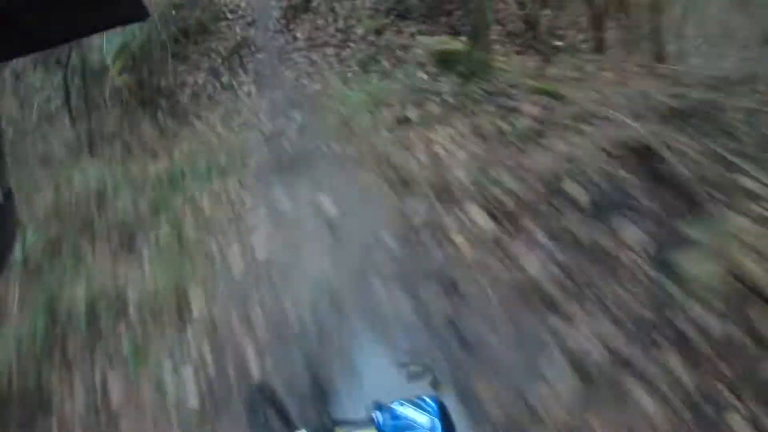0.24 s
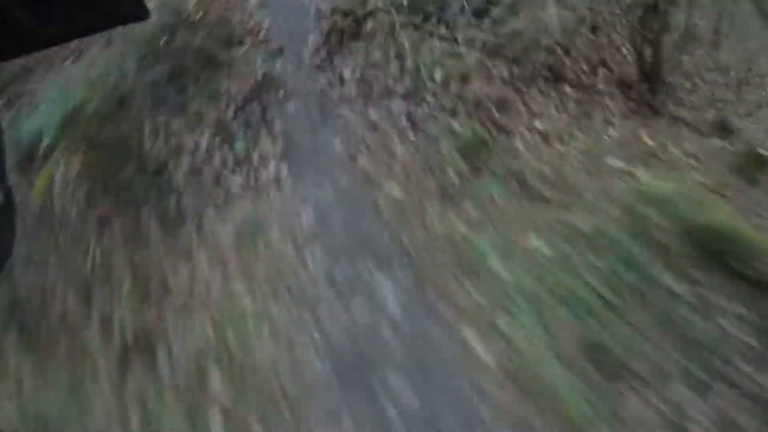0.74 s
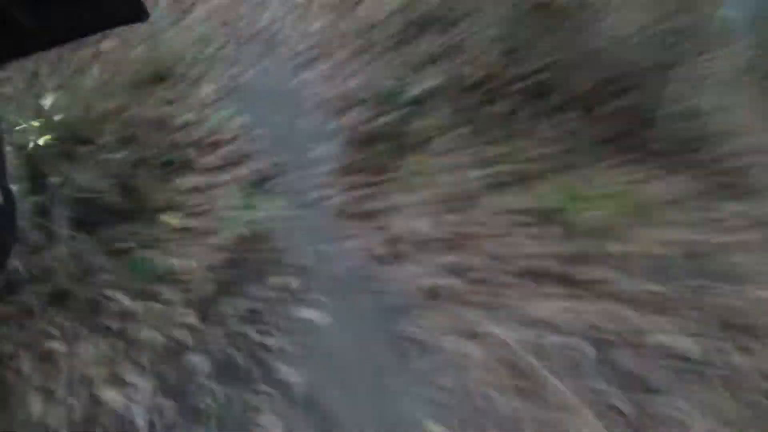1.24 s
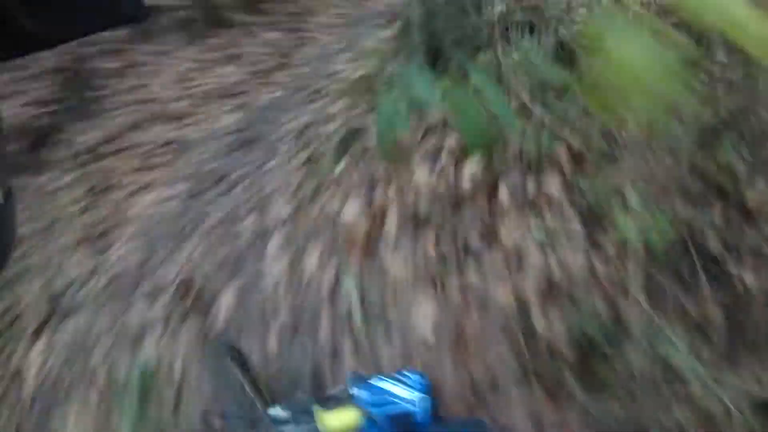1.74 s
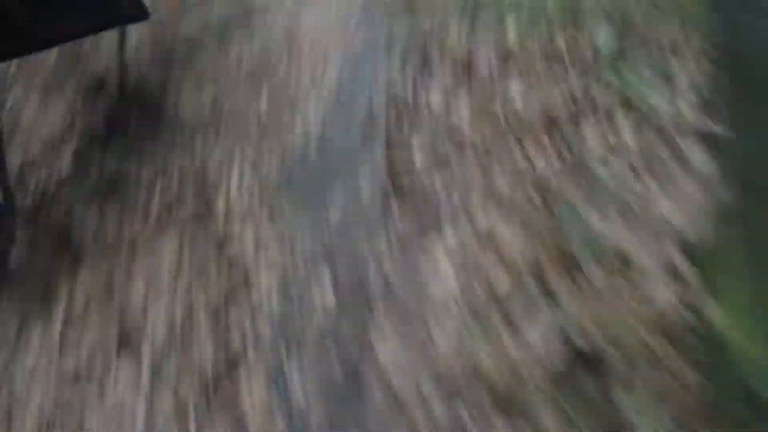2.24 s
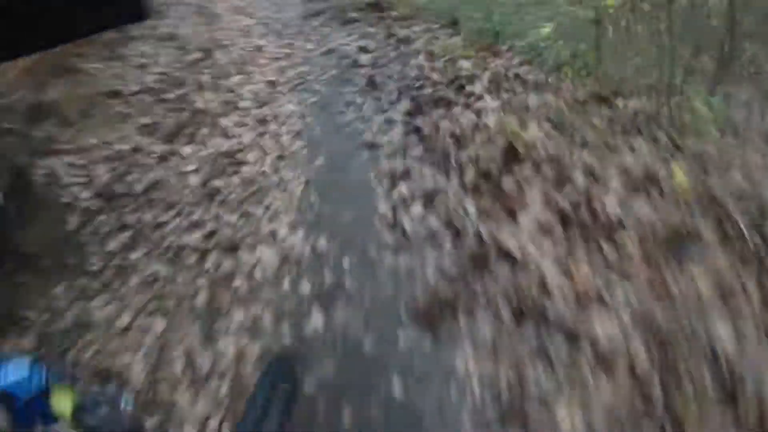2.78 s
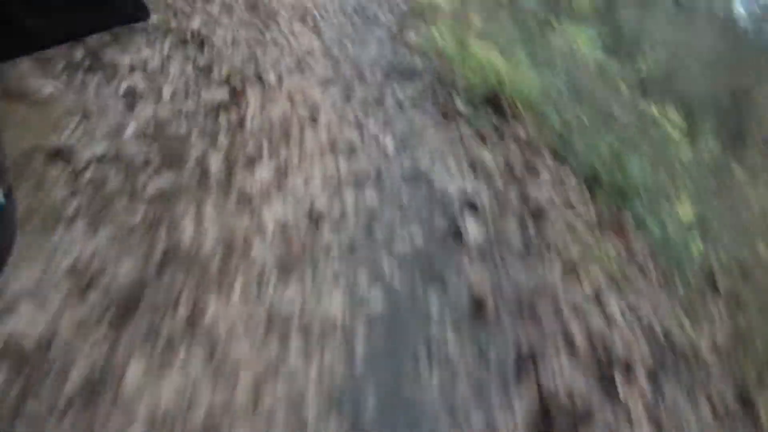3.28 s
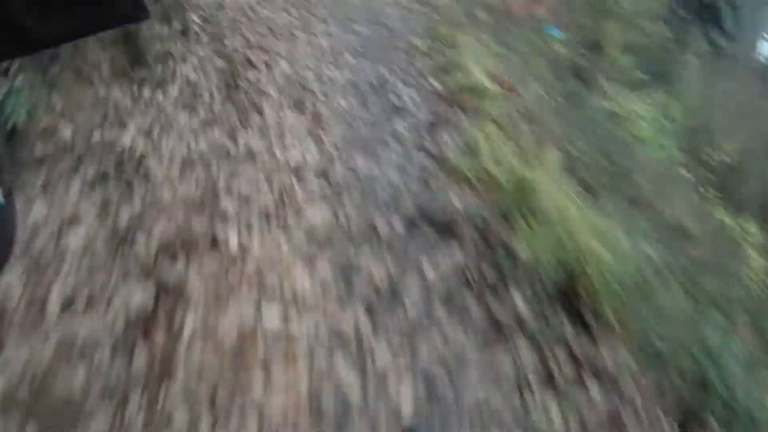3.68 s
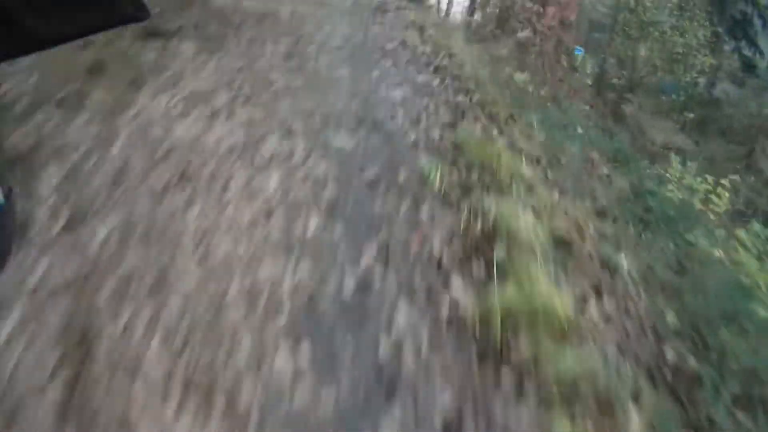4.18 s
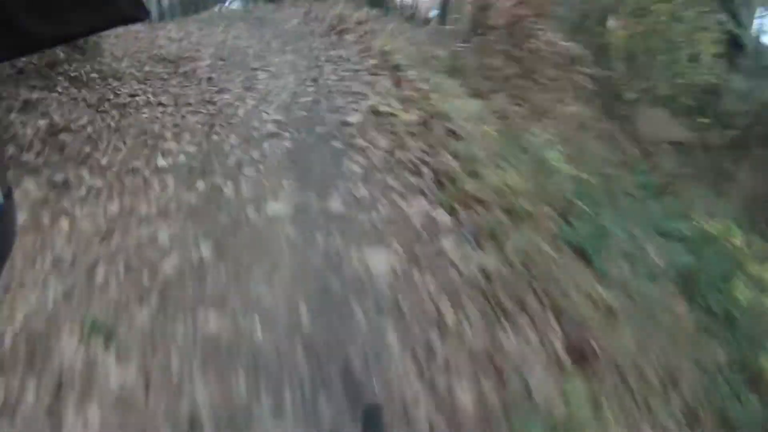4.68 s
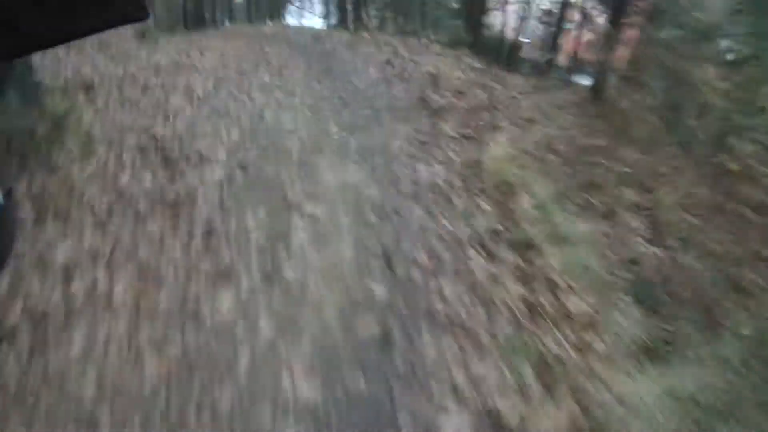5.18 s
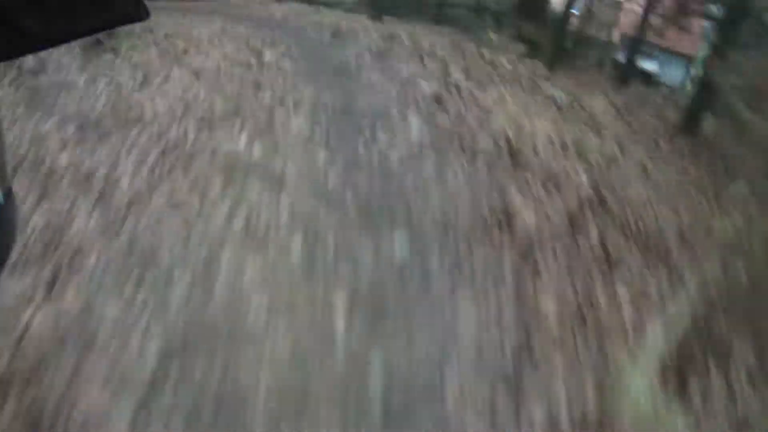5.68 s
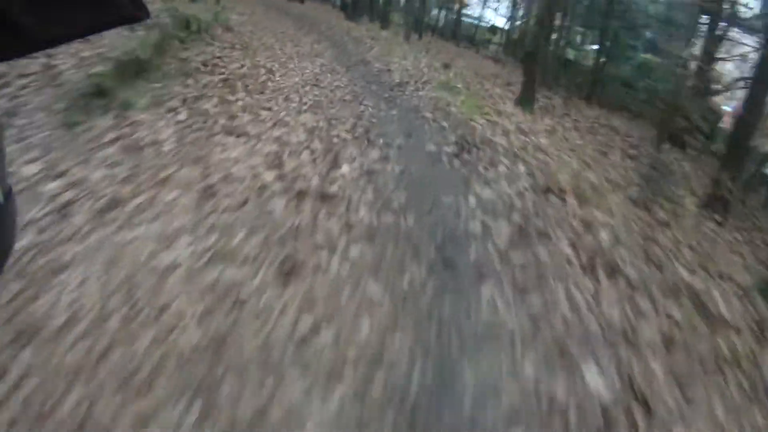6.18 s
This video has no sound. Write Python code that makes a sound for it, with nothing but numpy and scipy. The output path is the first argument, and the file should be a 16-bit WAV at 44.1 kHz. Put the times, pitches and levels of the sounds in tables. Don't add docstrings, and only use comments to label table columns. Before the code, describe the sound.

A fast bike ride on a leafy forest trail, heard through one sealed helmet microphone, nearly mono and muffled. At 0 s a low wind rumble is joined by a short thud, crisp snaps and millisecond dropouts. The roar grows from 0.7 to 1.4 s, fluttering, with a faint airy hiss, dull frame knocks near 0.8 and 1.05 s, and clipped jolts around 0.9 and 1.2 s. A heavier thud and knock land at 1.55 s. Wind sinks around 2.3 s, exposing dry leaf crackle, a twig snap and rattly knocks near 2.55 s, then a soft deep thud at 2.85 s. From about 3.5 s the wind surges, dense and loud, with rasping, hissing blasts, hard pops and ragged tears at 4.5 to 5.9 s. Leaves crunch underneath. A tiny dropout comes at 5.35 s; the last blast hisses sharply from 6.2 s until the abrupt end at 6.4 s.

```python
import sys
import numpy as np
from scipy import signal
from scipy.fft import rfft, irfft
from scipy.io import wavfile
from scipy.ndimage import uniform_filter1d, map_coordinates

SR = 44100
rng = np.random.default_rng(int(sys.argv[2]) if len(sys.argv) > 2 else 0)


def volts(x):
    e = np.asarray(x, float) / 20
    return 10 ** e


def dump_mix(stems):
    frames = np.atleast_2d(stems).T
    limited = np.clip(frames, -1, 1)
    pcm = np.round(limited * 32767).astype(np.int16)
    wavfile.write(sys.argv[1], SR, pcm)


N = 283563

# pitch_hz, level_db (per Hz)
BUFFET_COLOUR = [(30, -37), (54, -11), (95, -6), (150, -5.5), (210, -10.5), (330, -49)]
ROAR_COLOUR = [(70, -28), (140, -5), (210, 0), (300, -2.5), (500, -5.5), (680, -14.5), (1000, -26),
               (1650, -36.5)]
EDGE_COLOUR = [(300, -8), (600, -4), (900, -4), (2000, -10.5), (2320, -19), (3400, -38.5), (4420, -49)]
WHISTLE_COLOUR = [(1410, 1), (2400, 0), (2710, -5.5), (3030, -9.5), (3580, -12), (4020, -7.5), (4800, -23),
                  (6240, -43), (10600, -120)]
PORT_COLOUR = [(3300, -24), (3800, -1), (4050, -3), (4300, -8), (5000, -33)]
RIM_COLOUR = [(2200, -25), (2700, 0.5), (3100, 2), (3400, -6), (3900, -25)]
SHAKE_COLOUR = [(15, -42), (28, -4), (55, -0.5), (110, -15)]
LEAF_COLOUR = [(2500, -8), (3300, -6), (4510, -7), (5120, -5.5), (5600, -7), (6450, -4), (8060, -9.5),
               (10000, -20), (13000, -13), (15200, -13.5)]
CRISP_COLOUR = [(7000, -38), (8300, -10), (9500, -2.5), (11000, -7.5), (12600, -13), (14500, -32)]
BRUSH_COLOUR = [(5600, -30), (6300, -7), (6650, 3), (7000, -2), (7800, -30)]
HISS_COLOUR = [(60, -32), (400, -11), (2400, -11), (4000, -11), (9100, -9.5), (12500, -12), (15200, -17)]
HISS_APART = [(60, -3), (9300, -4.5), (9900, -7), (15200, -10)]
SURGE_COLOUR = [(30, -16), (150, 3.5), (450, 2), (1100, -9), (2400, -24), (5000, -35)]

# time_s, flow_db, sharpness_db, slow_heave_db
AIR = [(0, -51, -13.5, 2), (.36, -48, -12.5, -0.5), (.75, -43, -13, -3), (1.1, -40.5, -14.5, -12),
       (1.4, -41.5, -14, -5), (1.7, -44.5, -12, -0.5), (2.08, -47.5, -12.5, -0.5), (2.33, -57.5, -11.5, -1),
       (2.58, -52.5, -4.5, 0), (2.8, -47.5, -16, -2.5), (3.15, -46.5, -18, 1.5), (3.55, -34, -17.5, -3.5),
       (4.15, -33, -14.5, -1.5), (4.55, -35.5, -11, -0.5), (5.0, -35, -13, 0), (5.45, -34, -11, 2.5),
       (5.9, -35, -15, 0.5), (6.43, -32, -11, -8.5)]
# middle_s, length_s, level_db
GUSTS = [(0.018, 0.03, 3), (0.044, 0.015, -1), (0.083, 0.075, -2), (0.317, 0.04, 5), (0.468, 0.045, 3.5),
         (0.678, 0.083, -1), (1.02, 0.053, 2.5), (1.16, 0.12, 4.5), (1.297, 0.035, -3.5), (1.416, 0.1, -4),
         (1.58, 0.13, 0.5), (1.7, 0.12, 2), (1.908, 0.048, -1.5), (2.553, 0.054, -1.5), (2.878, 0.038, 0),
         (3.06, 0.022, 0), (3.29, .05, 4), (3.42, 0.079, -1), (3.59, 0.12, 3), (3.67, 0.13, 2.5),
         (3.97, 0.07, -2.5), (4.29, 0.24, -1.5), (4.4, 0.11, 1.5), (4.525, 0.2, -2.5), (4.87, 0.052, -1.5),
         (4.966, 0.066, 3.5), (5.188, 0.088, -4.5), (5.33, 0.071, 2), (5.6, 0.08, 0.5), (5.743, 0.12, -4),
         (6.01, 0.1, -2.5), (6.167, 0.16, 2), (6.394, 0.036, 1.5)]
# start_s, length_s, added_sharpness_db, added_whistle_db
BLASTS = [
    (0.793, 0.82, 0.5, 4.5),
    (2.25, 0.35, -5, 10.5),
    (3.595, 0.36, 8, 5),
    (5.853, 0.475, 2, 1.5),
    (6.243, .3, 1.5, 6.5),
]
# start_s, peak_db, body_db
STRONG_EDDIES = [(0.388, -38, 2.5), (0.433, -37, -8), (0.46, -42, -6), (0.537, -35.5, -20),
                 (0.588, -37, -5.5), (0.745, -33, -7.5), (0.814, -45, -8), (1.182, -40, 1),
                 (1.205, -38.5, 7), (1.802, -35, -15), (1.996, -36, -5), (2.591, -38, -13),
                 (2.717, -42.5, -2), (2.805, -45.5, 4), (3.007, -48, 4), (3.142, -49.5, 15),
                 (3.284, -40, 0), (3.408, -54, 3), (3.483, -42, 1), (4.128, -33, -6), (4.361, -29, -2),
                 (4.49, -24, -17), (4.647, -37, -9), (4.865, -24, -8), (4.889, -24, -12), (5.075, -42, 6),
                 (5.454, -30, -2), (5.687, -34, -4), (5.803, -26.5, -8), (5.866, -24.5, -8)]
# start_s, peak_db, brightness_db
TEARS = [(0.2596, -54, -30), (0.4332, -41, -21), (0.4604, -46, -33), (0.536, -50, -19), (0.5871, -43, -36),
         (0.6163, -45, -43), (0.7453, -49, -31), (0.8132, -40.5, -16), (1.0571, -39, -28),
         (1.2252, -43, -28), (1.5489, -39, -31), (1.6058, -44, -27), (1.747, -39, -36),
         (1.9964, -42.5, -31), (2.5463, -47, -27), (2.718, -47, -31), (3.484, -46, -26), (3.6027, -33, -29),
         (3.6307, -38, -32), (3.664, -39, -20), (3.8468, -39, -30), (3.9988, -41, -30), (4.061, -31.5, -32),
         (4.1076, -36.5, -33), (4.1271, -38, -34), (4.3601, -40, -18), (4.374, -37, -22), (4.403, -47, -21),
         (4.4193, -36, -21), (4.4738, -38, -27), (4.491, -33, -35), (4.5352, -34, -32), (4.6479, -34, -30),
         (4.6986, -35, -48), (4.7248, -32.5, -42), (4.7906, -46, -34), (4.8385, -38, -29),
         (4.8684, -30, -33), (4.8914, -32, -28), (4.9429, -34, -30), (5.0557, -33.5, -33),
         (5.0754, -43, -33), (5.1233, -39.5, -35), (5.2495, -40, -35), (5.2585, -38, -33),
         (5.3593, -40, -25), (5.4511, -33, -26), (5.5428, -37.5, -28), (5.6878, -33.5, -34),
         (5.7868, -34.5, -39), (5.8063, -39, -36), (5.8646, -33, -30), (5.906, -45, -30),
         (6.0569, -33.5, -24), (6.135, -33, -33), (6.1937, -36.5, -16), (6.2213, -42, -30),
         (6.2468, -36.5, -13.5), (6.3416, -30.5, -20), (6.373, -30, -33),
         (0.123, -60, -17), (0.2144, -54, -27), (0.293, -52, -28), (0.3144, -48, -26),
               (0.412, -50, -25), (0.4778, -45, -33), (0.5122, -52, -20), (0.5544, -49, -23),
               (0.658, -42, -34), (0.719, -43, -32), (0.998, -49, -18), (1.1226, -41.5, -35),
               (1.3608, -44, -32), (1.476, -53, -17), (1.6847, -41, -37), (1.7153, -43.5, -26),
               (1.779, -48, -31), (1.8008, -48, -27), (1.8498, -41.5, -31), (1.8956, -48, -29),
               (2.138, -57, -28), (2.6897, -46, -29), (2.746, -57, -18), (2.8055, -51, -29),
               (2.8285, -53, -28), (2.9701, -52, -26), (3.0076, -55, -25), (3.0682, -46, -38),
               (3.1107, -51, -30), (3.2063, -52, -29), (3.283, -42, -29), (3.4092, -43, -24),
               (3.6474, -30, -28), (3.6794, -38, -22), (3.7194, -33, -21), (3.7842, -36, -15),
               (3.799, -42, -16), (3.8248, -40, -23), (3.8692, -39, -17), (3.8997, -31.5, -20),
               (3.9194, -38, -26), (4.2991, -45.5, -17), (4.7727, -33, -34), (4.851, -33.5, -24),
               (4.9784, -33, -39), (4.9998, -39, -29), (5.0346, -45, -34), (5.1418, -38, -28),
               (5.3294, -42, -29), (5.4888, -35, -27), (5.6066, -34, -24), (5.889, -51, -32),
               (5.9844, -38, -16), (6.01, -41.5, -15), (6.2694, -38, -21), (6.3209, -38, -14),
               (6.402, -36.5, -13)]
# time_s, depth_db, dryness_db
LITTER = [(0, -81.5, -6), (.66, -88.5, 0.5), (1.1, -84, -3), (1.5, -81.5, 0), (1.85, -88, -3),
          (2.18, -76.5, -3), (2.32, -85.5, 3), (2.46, -74, 2.5), (2.68, -73.5, -5), (2.76, -78, -4),
          (2.87, -82.5, -0.5), (3.3, -81, -5), (3.5, -74.5, -3.5), (4.12, -75.5, -3), (4.52, -72, -4.5),
          (4.8, -79.5, -2.5), (5.95, -80.5, -3), (6.25, -75, -3), (6.43, -79, -3)]
# middle_s, length_s, level_db
DRIFTS = [
    (1.34, 0.055, 5),
    (1.48, .08, 7),
    (2.97, 0.11, 4.5),
    (3.88, .08, 2.5),
    (4.1, 0.26, 5.5),
    (4.5, .08, 1),
    (5.12, 0.29, 5),
    (5.58, .1, 2.5),
    (6.38, .06, 1),
]
# start_s, peak_db, dullness_db, ring_s (time to fall 60 dB)
SNAPS = [(0.0082, -42, -25, 0.0056), (0.0205, -51, -8, 0.009), (0.2848, -62, -15, .06),
         (0.134, -65, -5, .03), (0.459, -58, -22, .04), (0.5402, -58, -15, .03), (0.813, -52.5, -4, 0.12),
         (0.8879, -55, -7, .04), (0.9043, -54, -9, .04), (0.9622, -61, -13, 0.095), (1.043, -52, 0, 0.036),
         (1.0555, -56, -9, 0.06), (1.29, -58, -15, .025), (1.3324, -58, -10, .04), (1.559, -60, 5, 0.11),
         (1.6955, -57, -22, .02), (1.7994, -60, -16, .04), (1.973, -56.5, -21, .05),
         (2.101, -49.5, -31, 0.05), (2.384, -65, -17, .04), (2.548, -58.5, -0.5, 0.13),
         (2.59, -44, -9, 0.029), (2.669, -54.5, -3, 0.064), (3.864, -46, 5, 0.024),
         (4.001, -52, -11, 0.049), (4.066, -55, -3, .04), (4.0881, -47, -11, 0.029), (4.1011, -51, -5, .05),
         (4.488, -56, -5, .05), (4.8155, -55, -20, .02), (4.9375, -45.5, -3.5, 0.045),
         (4.9926, -57, -15, .025), (5.037, -60, -12, .06), (5.0519, -52.5, -20, .05), (5.797, -59, -7, .05),
         (6.047, -58, 2, 0.054), (6.184, -50, -9, 0.037), (6.2248, -57, -8, 0.065),
         (6.35, -55.5, 13, 0.037)]
# start_s, level_db, pitch_hz, ring_s
LANDINGS = [
    (0.0402, -33, 70, 0.021),
    (1.551, -32, 57.7, 0.053),
    (1.619, -39, 70, 0.046),
    (2.84, -38, 55, 0.05),
]
# start_s, peak_db, upper_mode_hz, upper_mode_db, ring_length_share
KNOCKS = [(.26, -59, 1520, 17, 0.33), (0.435, -50, 1900, 3, 0.34), (0.539, -59, 3180, 5, .4),
          (0.616, -53, 1600, 15, 0.4), (0.812, -46.5, 1710, -10, 1.1), (1.0568, -47.5, 2030, 8.5, 1.14),
          (1.549, -53.5, 1556, 8, 1.9), (2.138, -63, 3800, 3, .6), (2.5446, -45.5, 1760, 5, 0.78),
          (2.5507, -50, 1750, 1, 0.6), (0.815, -61, 3820, 10, .8), (2.673, -61, 1400, 2, 0.69)]
# pitch_hz, level_db, ring_s
FRAME_MODES = [(1230, 7, 0.061), (1400, -14, 0.036), (3600, -16.5, 0.026)]
# start_s, length_s, level_db
SINGS = [
    (.8, 0.63, 12),
    (3.62, .33, 6),
    (4.0, 0.3, 18),
    (4.35, .2, 12),
    (5.82, .24, 16),
    (6.07, .16, 19),
    (6.25, .3, 18),
]
# start_s, length_s, level_db
RASPS = [
    (.85, .45, 4),
    (3.6, 0.23, 23),
    (3.83, .11, 21),
    (4.3, 0.29, 18),
    (6.25, .12, 22),
    (6.39, .1, 17),
]
# start_s, length_s, level_db
BRUSHES = [
    (2.42, .26, 6),
    (3.86, .7, 10),
    (6.17, 0.13, 27),
]
# start_s, end_s, kick_before, kick_after
STALLS = [
    (.0285, .0384, -.052, -.038),
    (.049, .0528, -.02, -.006),
    (.917, .9198, .012, .016),
    (1.1972, 1.198, 0, 0),
    (1.2012, 1.204, 0, -.034),
    (1.5715, 1.5755, .05, .034),
    (5.3462, 5.3492, .025, .03),
]
# middle_s, level_db
SPLITS = [(.04, -42), (.7, -74), (.92, -50), (1.2, -47), (1.315, -54), (1.57, -49), (1.664, -50),
          (3.425, -46), (3.81, -59), (4.05, -56), (4.16, -61), (5.35, -46), (5.395, -47), (5.59, -65)]
# start_s, end_s
TREBLE_SHUT = [(0, .37), (.4, .6), (.63, .8), (.91, 1.04), (1.08, 1.68), (1.71, 2.09), (2.22, 2.4),
               (2.53, 2.62), (3.23, 3.27), (3.47, 3.49), (3.95, 4), (4.81, 4.84), (5.24, 5.26),
               (5.63, 5.68)]

BUFFET_DB, WHISTLE_DB = -46.5, -72.5


def unit(x):
    return x / np.sqrt(np.mean(x ** 2) + 1e-20)


def wobble(rate):
    knots = rng.standard_normal(int(N * rate / SR) + 4)
    return map_coordinates(knots, [np.arange(N) * rate / SR])


def response(spectrum, size=4096):
    hz, db = np.transpose(spectrum)
    log_hz = np.log(np.fft.rfftfreq(size, 1 / SR) + 1)
    gain = volts(np.interp(log_hz, np.log(hz), db, -120, -120))
    cepstrum = irfft(np.log(gain + 1e-6), size)
    cepstrum[1:size // 2] *= 2
    cepstrum[size // 2 + 1:] = 0
    h = irfft(np.exp(rfft(cepstrum)), size)
    return h / np.linalg.norm(h)


def coloured(x, spectrum):
    return signal.fftconvolve(x, response(spectrum))[:N]


def grains(per_s, spread_db, smooth):
    draw = rng.random((3, N))
    size = volts(spread_db * np.minimum(-np.log(1 - draw[1]), 4.5)) * np.sign(draw[2] - .5)
    hits = unit(size * (draw[0] < per_s / SR))
    return hits + smooth * rng.standard_normal(N)


def add(track, s, sound):
    part = track[round(s * SR):][:len(sound)]
    part += sound[:len(part)]


def curves(rows):
    s, *cols = np.transpose(rows)
    return [np.interp(np.arange(N) / SR, s, c) for c in cols]


def bumps(rows):
    t = np.arange(N) / SR
    return sum(db * np.exp(-(2 * (t - s) / length) ** 2) for s, length, db in rows)


def plateaus(rows, column):
    t, edge_s = np.arange(N) / SR, 0.087
    total = np.zeros(N)
    for row in rows:
        inside_s = np.minimum(t - row[0], row[0] + row[1] - t)
        total += row[column] * np.clip(inside_s / edge_s + .5, 0, 1)
    return total


def airflow():
    flow_db, sharp_db, heave_db = curves(AIR)
    flow = flow_db + 42
    sharp = sharp_db + 14 + plateaus(BLASTS, column=2)
    gust = bumps(GUSTS)
    buffet_db = BUFFET_DB + 0.8 * flow + heave_db + gust
    roar_db = -42.5 + flow + gust
    edge_db = -56 + flow + sharp + 1.2 * gust
    whistle_db = WHISTLE_DB + 0.61 * flow + 0.8 * sharp + 0.64 * gust + plateaus(BLASTS, column=3)
    return buffet_db, roar_db, edge_db, whistle_db


def lesser_eddies(roar_db):
    per_s, over_roar_db, spread_db = 2, 2, 3
    draw = rng.random((int(per_s * N / SR), 3))
    s = .1 + draw[:, 0] * (N / SR - .2)
    db = roar_db[(s * SR).astype(int)] + over_roar_db + 2 * spread_db * (draw[:, 1] - .5)
    body_db = -3 + 8 * (draw[:, 2] - .5)
    return list(zip(s, db, body_db))


def bursts(rows):
    lull_db, body, crest = np.zeros((3, N))
    t = np.arange(SR // 30) / SR
    for s, db, body_db in rows:
        ragged = 0.1 * rng.standard_normal(len(t)) * volts(-60 * t / 0.042)
        ragged[0] = np.sign(ragged[0])
        add(crest, s, ragged * volts(db + 1.5))
        add(body, s, ragged * volts(db + body_db + 19.0))
        add(lull_db, s - .008, -6 * np.hanning(SR // 110))
    sharp = coloured(crest, EDGE_COLOUR) + volts(-42.0) * coloured(crest, WHISTLE_COLOUR)
    return volts(lull_db), coloured(body, ROAR_COLOUR) + sharp


def air_tears():
    rise_s, ring_s = .005, .011
    gap_db, dull, bright = np.zeros((3, N))
    t = np.arange(SR // 30) / SR
    swell = np.sin(np.pi / 2 * np.minimum(t / rise_s, 1)) ** 2
    shape = swell * volts(-60 * np.maximum(t - rise_s, 0) / ring_s)
    for s, db, bright_db in TEARS:
        spikes = unit(rng.standard_normal((2, len(t))) * rng.exponential(size=len(t)) ** .5)
        tear = spikes * shape ** rng.uniform(.6, 1.1) * volts(db - 5.5)
        add(dull, s - .003, tear[0])
        add(bright, s - .003, tear[1] * volts(bright_db + 10))
        add(gap_db, s - .012, -1.5 * np.hanning(SR // 90))
    return volts(gap_db), coloured(dull, EDGE_COLOUR) + coloured(bright, WHISTLE_COLOUR)


def wind(buffet_db, roar_db, edge_db, whistle_db):
    dense = np.clip((whistle_db + 72.5) / 12, 0, 1)
    flutter = (0.48 * wobble(13) + 0.57 * wobble(55)) * (1 - .5 * dense)
    coarse = unit(grains(per_s=700, spread_db=2.0, smooth=0.56) * volts(1.06 * wobble(150)))
    finer = unit(grains(per_s=2000, spread_db=3.0, smooth=0.87))
    eddies = np.sqrt(1 - 0.78 * dense) * coarse + np.sqrt(0.3 * dense) * finer
    lull, strong = bursts(STRONG_EDDIES + lesser_eddies(roar_db))

    buffet = unit(coloured(rng.standard_normal(N) + 0.13 * eddies, BUFFET_COLOUR)) * volts(buffet_db)
    body = unit(coloured(eddies + 1.14 * rng.standard_normal(N), ROAR_COLOUR))
    belly = signal.sosfiltfilt(signal.butter(2, 240, fs=SR, output="sos"), body)
    belly = belly * (volts(0.38 * (buffet_db - roar_db + 4)) - 1)
    brow = signal.sosfiltfilt(signal.butter(2, 430, "high", fs=SR, output="sos"), body)
    brow = brow * (volts(1.8 * (wobble(24) + 0.53 * wobble(60)) - 1.2) - 1)
    roar = (body + brow + belly) * volts(roar_db + 0.33 * flutter)

    edge_db = edge_db - .6 + .8 * flutter + 1.1 * wobble(22) + .5 * wobble(90)
    edge = unit(coloured(eddies, EDGE_COLOUR)) * volts(edge_db)
    whistle_db = whistle_db + 2.3 * flutter + 0.46 * wobble(26)
    whistle = unit(coloured(0.076 * coarse + finer, WHISTLE_COLOUR)) * volts(whistle_db)
    gap, tears = air_tears()
    up, down = .45, .08
    crest = np.sqrt(1 + up * np.maximum(body, 0) ** 2 + down * np.minimum(body, 0) ** 2)
    ride = crest / np.sqrt(1 + (up + down) / 2)
    return buffet + (roar + (edge + whistle) * gap * ride) * lull + strong + tears * np.sqrt(ride)


def helmet_shake(buffet_db):
    level_db = BUFFET_DB - 7.5 + 0.25 * (buffet_db - BUFFET_DB) + 2.5 * wobble(6.2)
    return unit(coloured(rng.standard_normal(N), SHAKE_COLOUR)) * volts(level_db)


def leaf_grains():
    return grains(per_s=6500, spread_db=4.5, smooth=0.86) * volts(0.25 * wobble(13.0) + 0.32 * wobble(28))


def leaves():
    depth_db, dry_db = curves(LITTER)
    depth_db = depth_db + bumps(DRIFTS) + wobble(30)
    rustle = unit(coloured(leaf_grains(), LEAF_COLOUR)) * volts(depth_db + 2.5)
    crackle = unit(coloured(leaf_grains(), CRISP_COLOUR)) * volts(depth_db + dry_db - 0.5)

    plain, crisp, dull = np.zeros((3, N))
    t = np.arange(SR // 8) / SR
    for s, db, dull_db, ring_s in SNAPS:
        fade = volts(db - 7 - 60 * t / ring_s) * (1 - np.exp(-t / 0.002))
        burst = rng.standard_normal((3, len(t))) * fade
        add(plain, s, burst[0])
        add(dull, s, burst[1] * volts(dull_db + 9.5))
        add(crisp, s, burst[2] * volts(-9 - 0.36 * dull_db))
    plain = signal.sosfilt(signal.butter(3, 11500, fs=SR, output="sos"), plain)
    snaps = coloured(plain, LEAF_COLOUR) + coloured(dull, WHISTLE_COLOUR) + coloured(crisp, CRISP_COLOUR)
    return rustle + crackle + snaps


def frame():
    out, t = np.zeros(N), np.arange(SR // 6) / SR
    for s, db, hz, level_db, share in KNOCKS:
        spot_modes = [(hz, level_db, .04), (1.2 * hz, level_db - 15.0, .04)]
        for mode_hz, mode_db, ring_s in FRAME_MODES + spot_modes:
            fade = volts(db + 1.0 + mode_db - 60 * t / (ring_s * share))
            attack = 1 - np.exp(-t / (0.0025 * share))
            add(out, s, fade * np.sin(2 * np.pi * mode_hz * t) * attack)
    for s, db, hz, ring_s in LANDINGS:
        thud = volts(db + 14.5 - 60 * t / ring_s) * np.sin(2 * np.pi * hz * t)
        add(out, s, thud * (1 - np.exp(-t / 0.0078)))
    return out


def port(whistle_db):
    level_db = -98 + 0.37 * (whistle_db - WHISTLE_DB) + plateaus(SINGS, column=2) + 2.6 * wobble(30)
    return unit(coloured(grains(per_s=3700, spread_db=4.5, smooth=0.82), PORT_COLOUR)) * volts(level_db)


def rasp():
    level_db = -89 + plateaus(RASPS, column=2) + 1.5 * wobble(45)
    return unit(coloured(grains(per_s=990, spread_db=3.5, smooth=0.72), RIM_COLOUR)) * volts(level_db)


def brushing():
    level_db = -102 + plateaus(BRUSHES, column=2) + 1.5 * wobble(25)
    return unit(coloured(grains(per_s=2500, spread_db=0.0, smooth=.6), BRUSH_COLOUR)) * volts(level_db)


def scene():
    air_db = airflow()
    air = wind(*air_db) + port(air_db[3]) + rasp()
    bike = helmet_shake(air_db[0]) + leaves() + frame() + brushing()
    return np.tile(air + bike, (2, 1))


def hiss():
    both, other = (unit(coloured(rng.standard_normal(N), HISS_COLOUR)) for _ in range(2))
    other = volts(-3.5) * unit(coloured(other, HISS_APART))
    return volts(-81.5) * np.array([.75 * both + other, .75 * both - other])


def stalled(x):
    t, gate, kicks = np.arange(N) / SR, np.ones(N), np.zeros(N)
    u = np.arange(SR // 100) / SR / .00036
    kick = u ** 2 * np.exp(2 - u) / 4
    for start, end, before, after in STALLS:
        ramp = np.clip(np.maximum(start - t, t - end) / .0015, 0, 1)
        gate *= .06 + .94 * np.sin(np.pi / 2 * ramp) ** 2
        add(kicks, start - .0018, before * kick)
        add(kicks, end, after * kick)
    x = x / (1 + np.abs(x / .14) ** 4) ** .25
    return x * gate + kicks


def split_rumble():
    length_s = 0.017
    level = sum(volts(db) * bumps([(s, length_s, 1)]) for s, db in SPLITS)
    surge = level * unit(coloured(rng.standard_normal(N), SURGE_COLOUR))
    return np.array([surge, -surge])


def thin_treble(x):
    hz, t, z = signal.stft(x, SR, nperseg=1024)
    shut = sum((t > a) & (t < b) for a, b in TREBLE_SHUT) > 0
    patches = rng.standard_normal(z.shape[1:]) + .6 * rng.standard_normal(z.shape)
    patches = uniform_filter1d(patches, size=4, axis=2)
    patches = unit(uniform_filter1d(patches, size=3, axis=1))
    kept = patches > -.1 + 1.5 * uniform_filter1d(1. * shut, size=9)
    grit = volts(-17) * uniform_filter1d(np.abs(z[0]), size=15, axis=0)
    grit = grit * np.exp(2j * np.pi * rng.random(z.shape[1:])) * (hz > 3000)[:, None]
    z = z + [grit, -grit]
    top = hz > 12800
    z[:, top] *= (1.4 * kept * ~shut)[:, top]
    return signal.istft(z, SR, nperseg=1024)[1][:, :N]


def low_pass(x):
    return signal.sosfilt(signal.butter(12, 15310, fs=SR, output="sos"), x)


def record(dry):
    heard = stalled(dry + hiss() + split_rumble())
    return low_pass(thin_treble(heard))


dry = scene()
out = record(dry)
dump_mix(out)
```